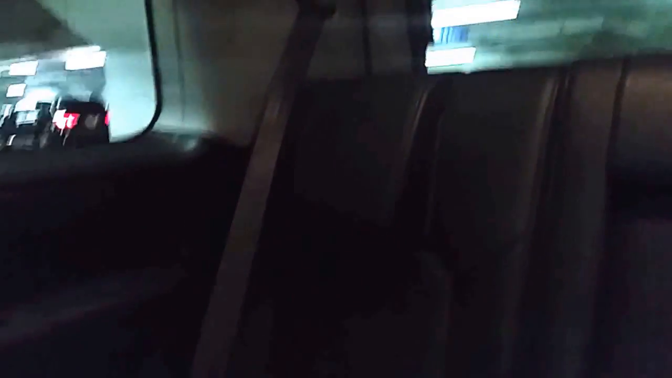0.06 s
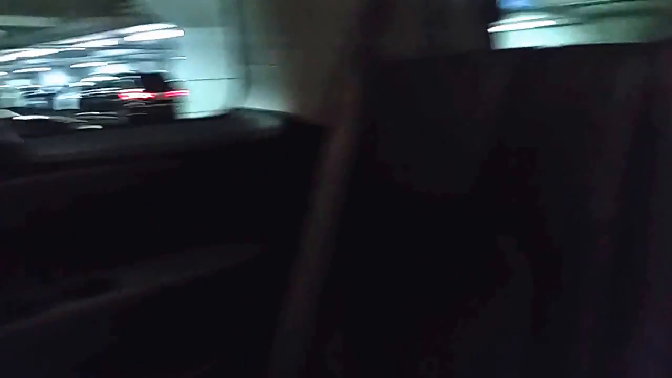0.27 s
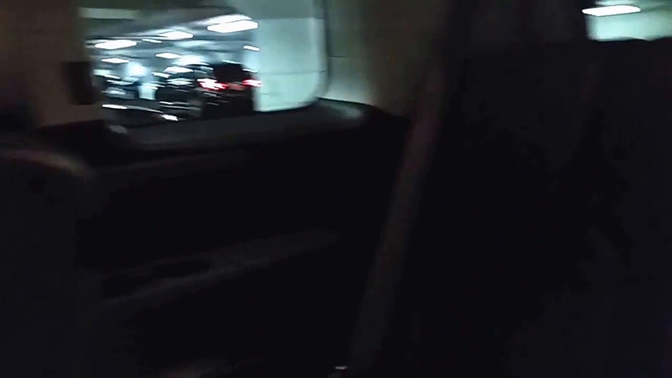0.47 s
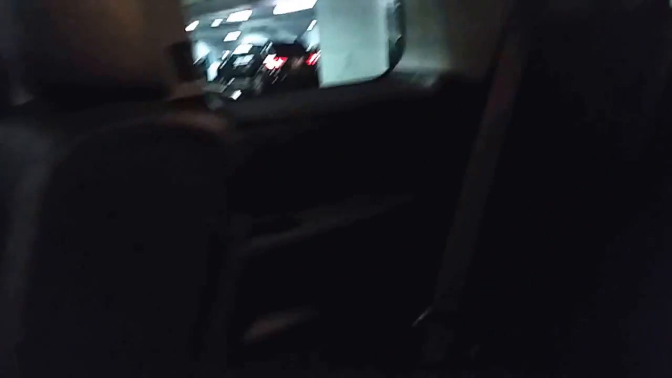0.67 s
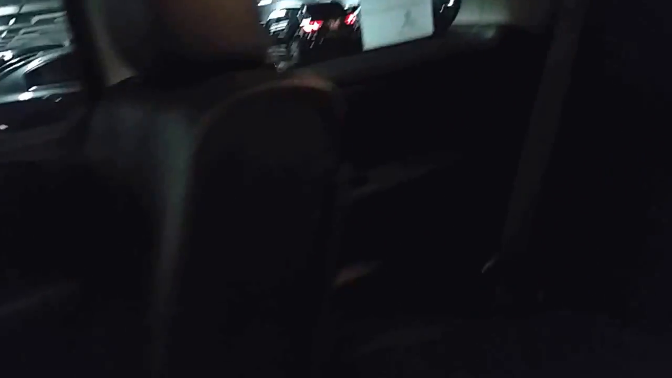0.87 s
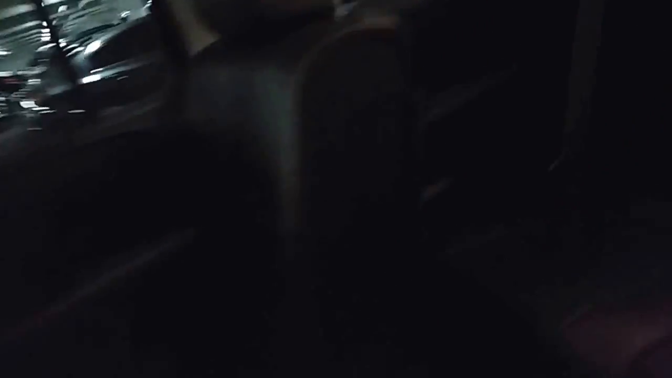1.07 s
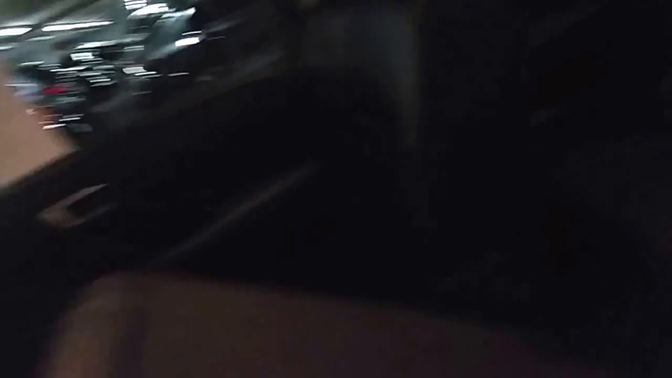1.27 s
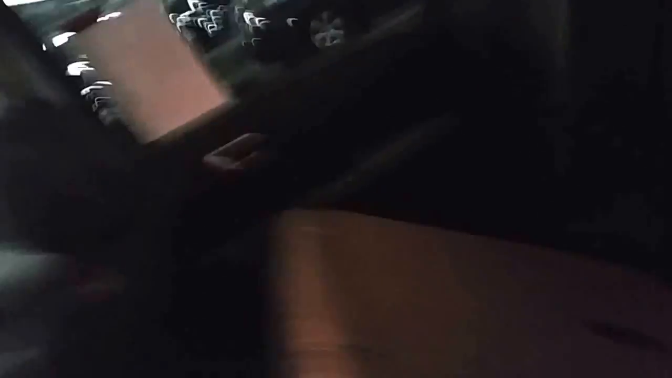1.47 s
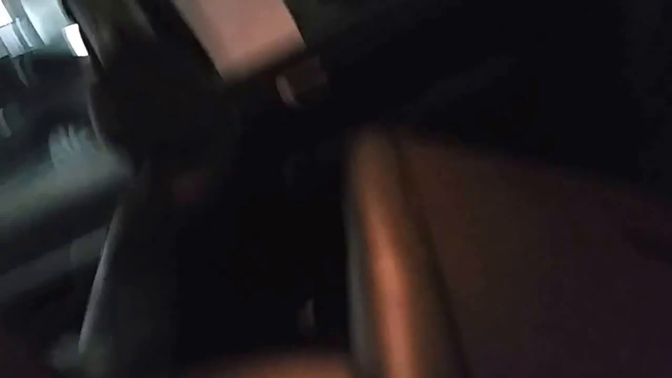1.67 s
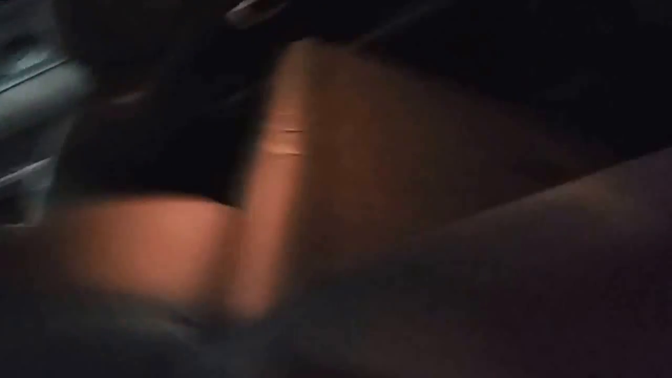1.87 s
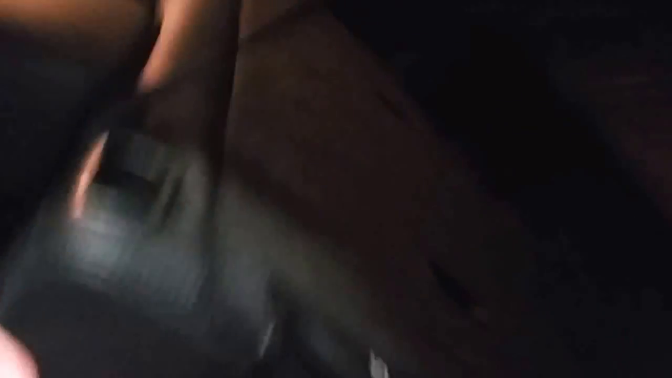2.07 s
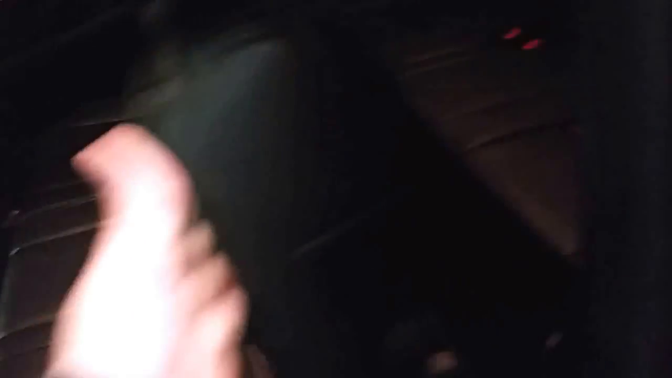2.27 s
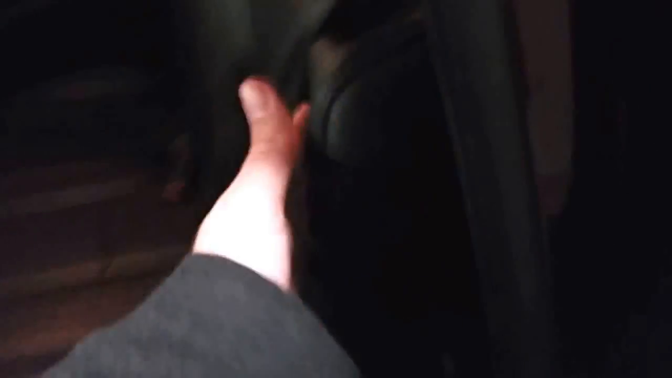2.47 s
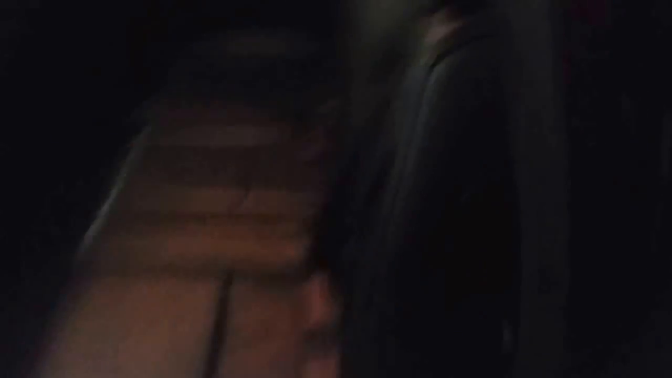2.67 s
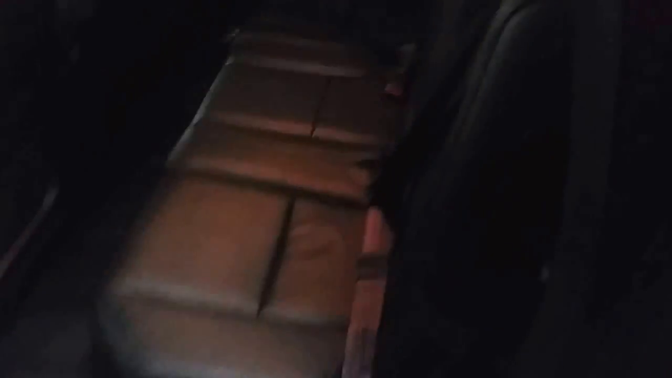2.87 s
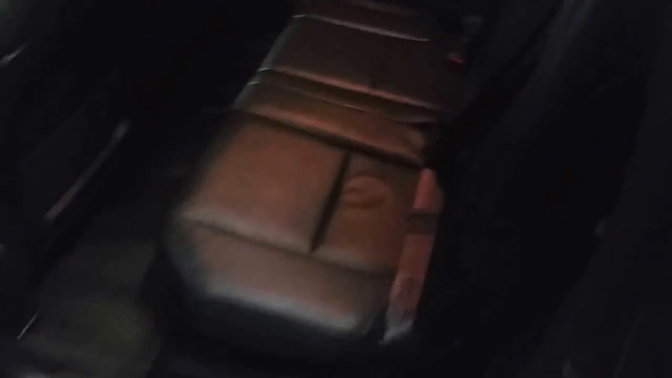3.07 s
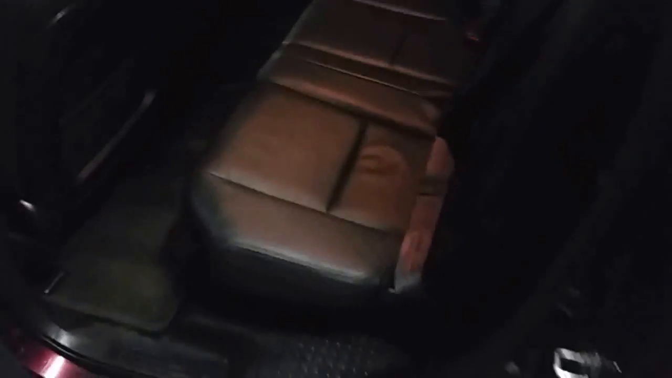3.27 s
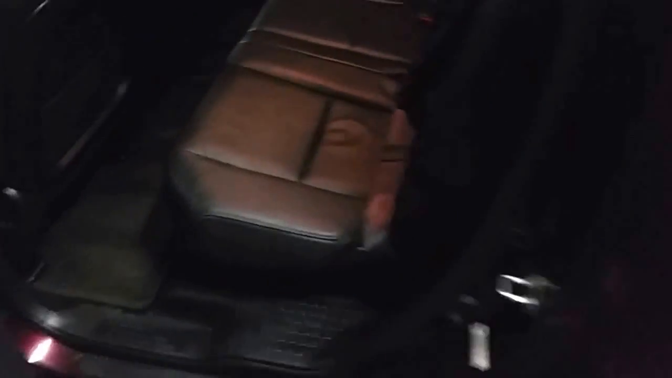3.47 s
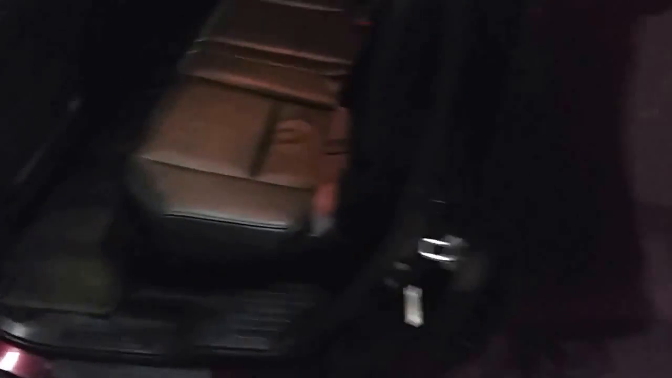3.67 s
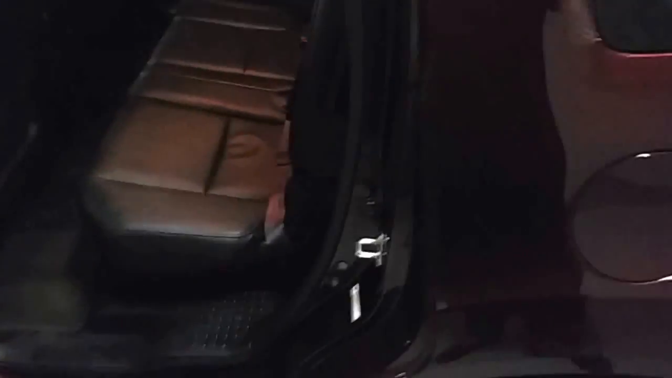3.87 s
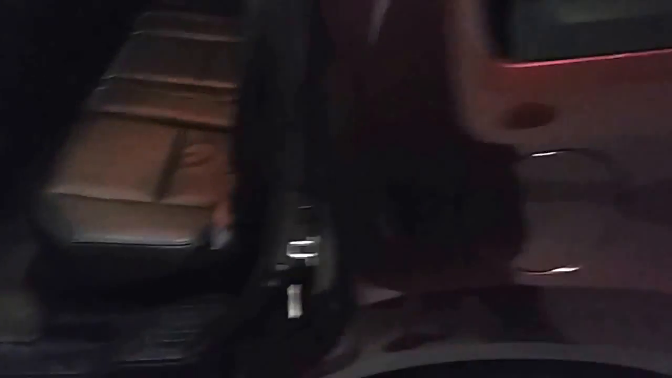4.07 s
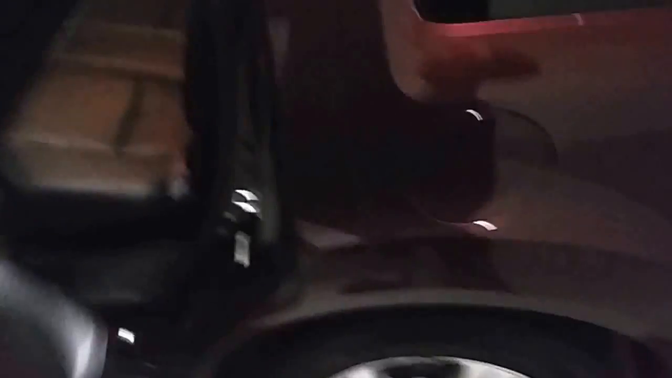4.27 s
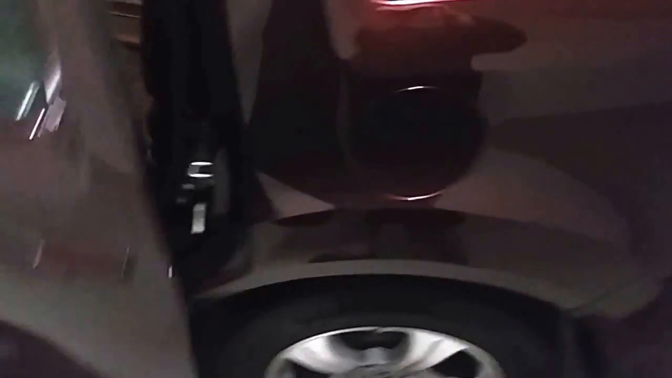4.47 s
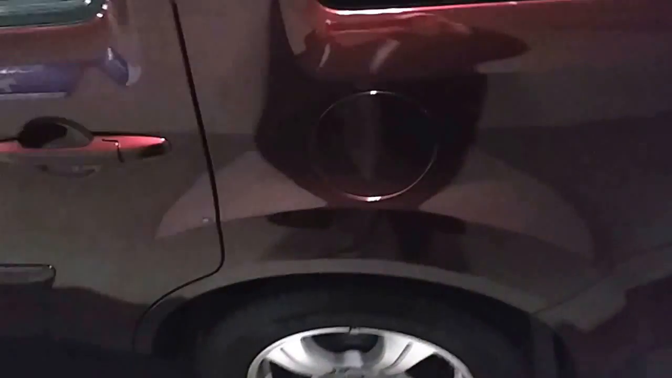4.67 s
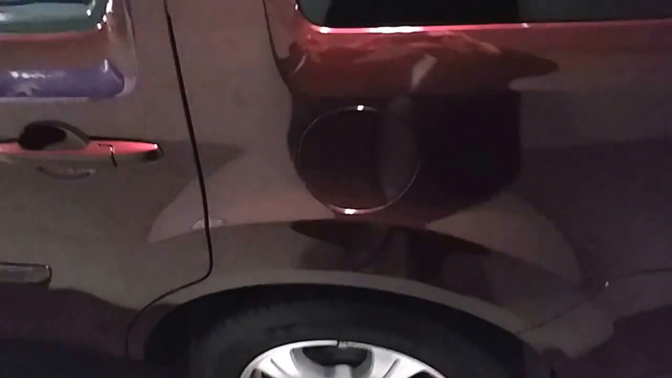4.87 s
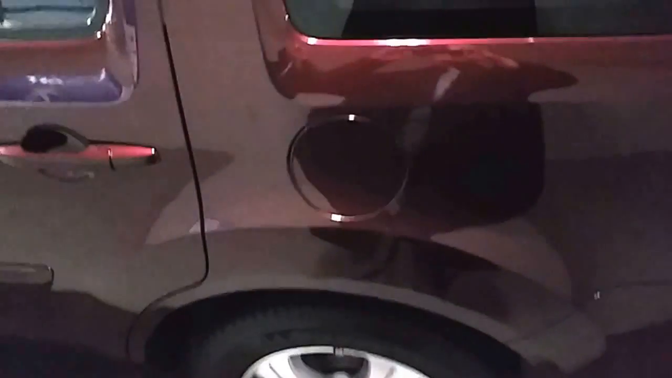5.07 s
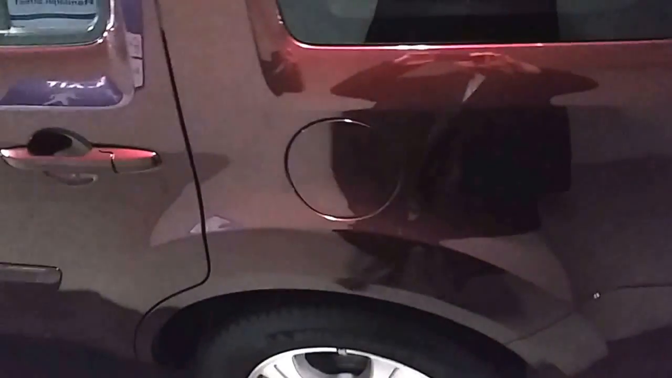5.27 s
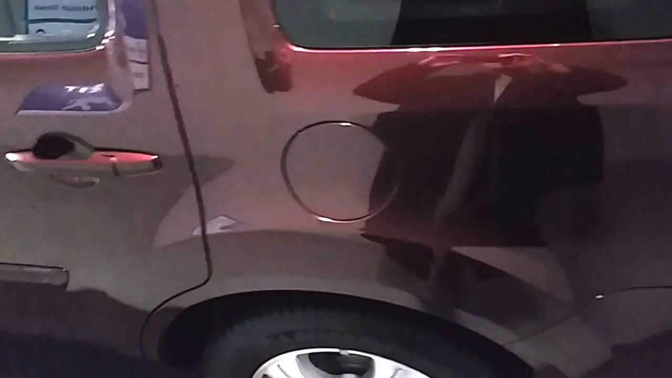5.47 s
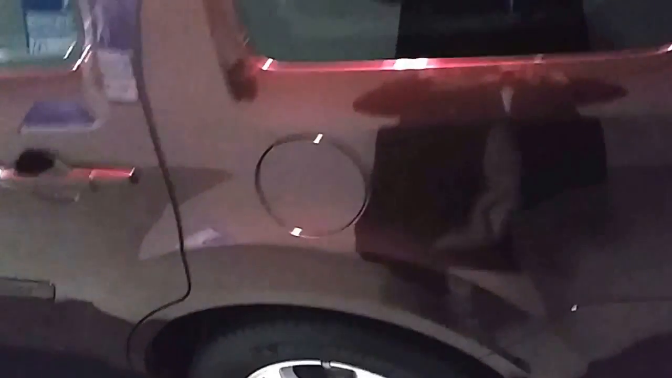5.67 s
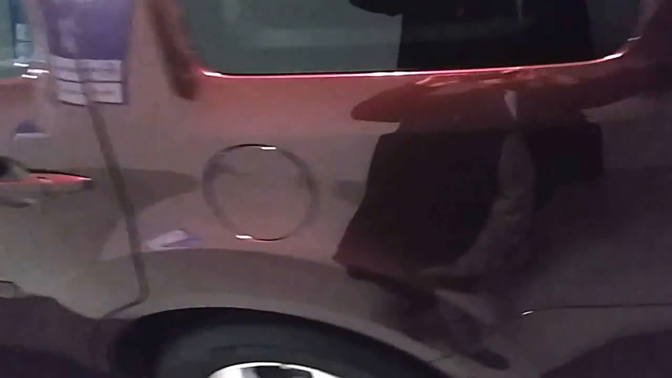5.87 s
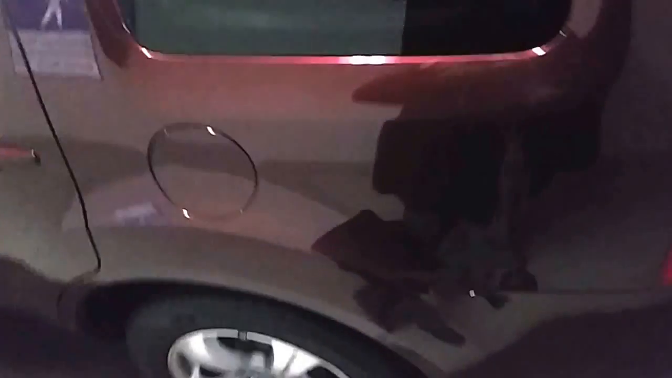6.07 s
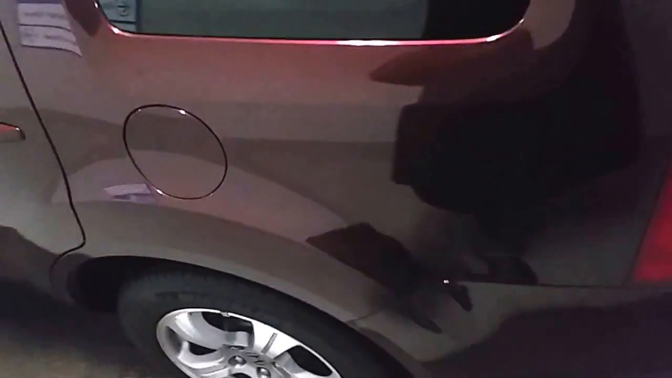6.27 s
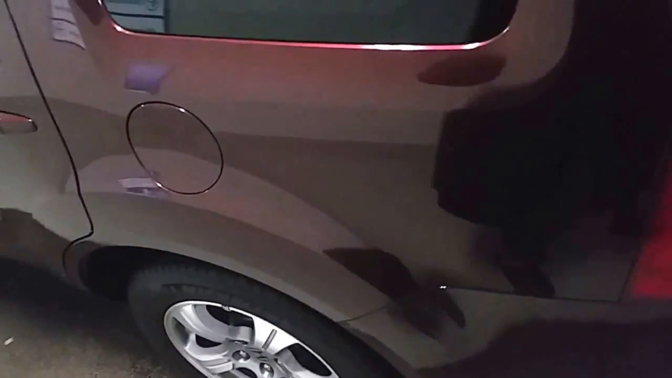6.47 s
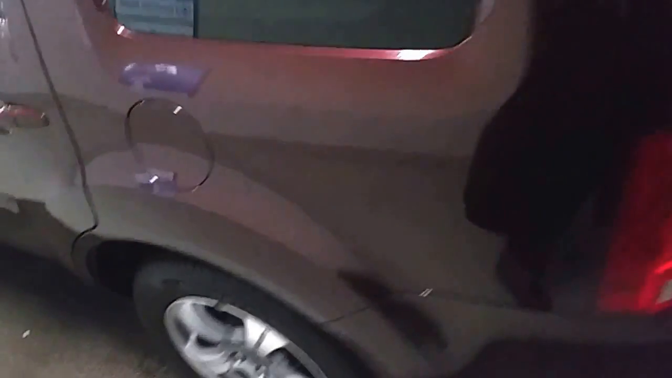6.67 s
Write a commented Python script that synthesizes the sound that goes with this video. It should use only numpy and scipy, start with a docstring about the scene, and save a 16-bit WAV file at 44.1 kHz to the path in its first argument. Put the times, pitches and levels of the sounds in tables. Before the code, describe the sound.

Close handheld stereo pickup in a car inside a concrete garage. Ventilation rumbles and hisses throughout. Fingers tap the camera case, cloth rubs leather, light knocks and clicks come from the seat trim. Metal catches clack and the seat back thumps hard and shudders, followed by a brief rough squeak. After small metallic chinks the door slams with a deep echoing boom; finally fingers bump the microphone.

```python
"""Car seat and door slam in a parking garage

Someone climbs out of a car holding a camera, over ventilation whose hiss swells and sinks.
Fingers tap the case, cloth rustles and something squeaks; a rear seat clacks into its catches and shudders.
Then the door slams and the garage answers. Impacts layer decaying modes with chattering noise bursts;
air and cloth are shaped noise. The two microphone ports colour the treble differently.
"""
import sys
import numpy as np
from scipy import signal
from scipy.fft import rfft, irfft, next_fast_len
from scipy.io import wavfile

SR = 44100
rng = np.random.default_rng(int(sys.argv[2]) if len(sys.argv) > 2 else 0)


def put_to_file(sound):
    """Save the sound as 16-bit audio at rate SR, in the file named by the first command-line argument."""
    columns = np.atleast_2d(sound).T  # one column per channel
    safe = np.clip(columns, -1, 1)
    whole_steps = np.round(safe * 32767)
    wavfile.write(sys.argv[1], SR, whole_steps.astype(np.int16))


N = 296325

# ring of the seat and cabin, before stretching: (f/Hz, level/dB, t60/s)
SEAT_MODES = [(62.8, -14, 1), (101.6, -2.5, 0.56), (126.5, 1.5, 0.29), (170.8, -0.5, 0.45),
              (221.4, -4.5, 0.36), (266, -15.5, 0.12), (346, -12, 0.4), (409, -11, 0.3)]
# dull body of a knock: (f/Hz, level/dB)
KNOCK_SPECTRUM = [(80, -31), (250, 3), (420, 2), (750, -2.5), (1100, -14), (1700, -23), (5000, -48)]
# loose trim: (f/Hz, level/dB)
RATTLE_SPECTRUM = [(250, -16), (420, 5), (650, -3), (1100, -1.5), (2000, -6), (3000, -19), (8000, -41)]
# bright crack of hard contact: (f/Hz, level/dB)
CRACK_SPECTRUM = [(100, -0.5), (400, -27), (1000, 2), (1700, 2.5), (3000, -1.5), (6000, -3.5), (11000, -4),
                  (16000, -15)]


def amp(db):
    """Turn decibels into gain."""
    return 10 ** (np.asarray(db) / 20)


def unit(x):
    """Scale to rms 1."""
    return x / np.sqrt(np.mean(x ** 2) + 1e-20)


def along(points, hz):
    """Read (f/Hz, value) points on a log frequency axis."""
    f, v = np.transpose(points)
    return np.interp(np.log(hz + 1), np.log(f + 1), v)


def filtered(x, response):
    """Shape the spectrum of x with a response of frequency."""
    n = x.shape[-1]
    padded = next_fast_len(n + SR // 10)
    spectrum = rfft(x, padded) * response(np.fft.rfftfreq(padded, 1 / SR))
    return irfft(spectrum, padded)[..., :n]


def noise(gain, n):
    """Stereo noise of rms 1, nearly mono in the bass, mixed from independent mid and side."""
    # left-right correlation: (f/Hz, correlation)
    likeness = [(60, 0.91), (250, 0.86), (600, 0.86), (1500, 0.07), (4000, 0.25), (12000, 0.37)]
    hz = np.fft.rfftfreq(n, 1 / SR)
    angle = np.arccos(np.clip(along(likeness, hz), -1, 1)) / 2
    white = rfft(rng.standard_normal((2, n)))
    mid, side = irfft(white * gain(hz) * [np.cos(angle), np.sin(angle)], n)
    return unit(np.array([mid + side, mid - side]))


def rush(spectrum, n):
    """Stereo noise with a (f/Hz, level/dB) spectrum."""
    return noise(lambda hz: amp(along(spectrum, hz)), next_fast_len(n))[:, :n]


def resonance(pitch, width, n):
    """Stereo noise through one resonance, pitch and width in Hz."""
    return noise(lambda hz: hz * width / np.abs(pitch ** 2 - hz ** 2 + 1j * hz * width), n)


def wobble(rate):
    """A random curve with `rate` knots a second, joined by straight lines."""
    knots = rng.standard_normal(int(N * rate / SR) + 2)
    return np.interp(np.arange(N) * rate / SR, np.arange(len(knots)), knots)


def fade(t, t60):
    """Exponential decay, 60 dB down after t60 seconds."""
    return np.exp(-np.log(1000) * t / t60)


def add(track, s, sound):
    """Mix a sound in at time s, cut off at the end of the track."""
    part = track[:, round(s * SR):][:, :sound.shape[-1]]
    part += sound[..., :part.shape[-1]]


def burst(spectrum, length, t60, attack, chatter_db=1.5, chatter_hz=700):
    """Dense short resonances as shaped noise, driven by chattering contact for `length` s, then dying."""
    t = np.arange(int((length + t60) * SR) + SR // 20) / SR
    knots = rng.standard_normal(int(t[-1] * chatter_hz) + 2)
    chatter_curve = np.interp(t * chatter_hz, np.arange(len(knots)), knots)
    chatter = unit(amp(chatter_db * chatter_curve))
    grains = chatter * noise(np.ones_like, next_fast_len(len(t)))[:, :len(t)]
    body = unit(filtered(grains, lambda hz: amp(along(spectrum, hz))))
    onset = 1 - np.exp(-t / attack)
    return body * onset * fade(np.maximum(t - length, 0), t60)


def ring(modes, stretch, ratio, scatter_db, detune):
    """A struck body: decaying sine modes whose strengths and pitches vary slightly with each blow."""
    t = np.arange(SR) / SR
    total = np.zeros(SR)
    for k, (hz, db, t60) in enumerate(modes):
        strength, pitch = rng.standard_normal(2)
        # alternate modes start with opposite polarity
        phase = 2 * np.pi * hz * ratio * (1 + detune * pitch) * t + np.pi * k
        total += amp(db + scatter_db * strength) * np.sin(phase) * fade(t, t60 * stretch)
    return total


def air():
    """Ventilation as shaped noise: rumble fades on leaving the cabin; fans and hiss swell and sink."""
    # level of the background hiss, read against reference_db: (t/s, level/dB)
    air_level = [
        [(0.0, -62.5), (0.288, -60.5), (0.762, -52.5), (0.85, -50)],
        [(2.7, -49), (3.06, -50), (3.376, -47.5), (3.676, -48), (4.28, -47)],
        [(4.7, -48.5), (4.92, -54), (5.2, -52.5), (5.75, -47), (6.7, -47.5)],
    ]
    # duct resonances and a bearing whine, level against the fan rush: (f/Hz, width/Hz, level/dB)
    ducts = [(117, 41, -7), (331, 55, -7.5), (780, 120, -5.5), (1626, 70, -16), (2730, 67, -17.5),
             (6790, 49, -21)]
    # low rumble: (f/Hz, level/dB)
    rumble_spectrum = [(15, -3), (35, -4), (60, -2), (110, 0), (170, -3.5), (250, -11.5), (400, -14),
                       (800, -20), (2000, -64)]
    # fan rush: (f/Hz, level/dB)
    fan_spectrum = [(100, 4), (230, 5.5), (330, -2.5), (450, -3), (620, 1), (780, 0.5), (1100, -2),
                    (1800, -6.5), (3000, -11), (6000, -25.5)]
    # airy hiss: (f/Hz, level/dB)
    hiss_spectrum = [(800, -22), (2500, 0.5), (4500, 0), (7000, -0.5), (11000, -12), (16000, -12)]
    # top-end fizz: (f/Hz, level/dB)
    fizz_spectrum = [(6000, -3), (9000, 2), (12000, 1.5), (16000, -4)]
    reference_db = -48
    fan_db, hiss_db, fizz_db = -40, -45.5, -47.5  # at the reference level
    fan_follows, fizz_follows = 0.77, 1.4  # dB per dB of hiss: treble sinks furthest when it is quiet
    step_out_s = (2.04, 4.6)  # start and end of the way out of the cabin
    cabin_rumble_db, outside_rumble_db = -37, -46
    cabin_fan_db = -2.5  # the cabin muffles the rush

    t = np.arange(N) / SR
    level_t, level_db = np.transpose(np.vstack(air_level))
    swell_db = np.interp(t, level_t, level_db) - reference_db
    inside = np.interp(t, step_out_s, [1, 0])

    rumble_db = inside * cabin_rumble_db + (1 - inside) * outside_rumble_db
    rumble = amp(rumble_db + wobble(12.0)) * rush(rumble_spectrum, N)

    fan_noise = rush(fan_spectrum, N)
    for hz, width, db in ducts:
        fan_noise += amp(db) * resonance(hz, width, next_fast_len(N))[:, :N]
    fan_level_db = fan_db + fan_follows * swell_db + cabin_fan_db * inside + 0.38 * wobble(4.7)
    fans = amp(fan_level_db) * fan_noise

    hiss = amp(hiss_db + swell_db) * rush(hiss_spectrum, N)
    fizz = amp(fizz_db + fizz_follows * swell_db) * rush(fizz_spectrum, N)
    return rumble + fans + hiss + fizz


def squeak(width_hz=230, overtone_db=-18):
    """A rough squeak, perhaps a tyre or shoe out in the garage, whose pitch and level rise and fall."""
    peak_s, level_db, rise_s, release_s = 2.39, -34, 0.08, 0.025  # peak_s: moment of the peak
    end_hz, peak_rise_hz = 1990, 369  # pitch at the ends, rise at the peak
    echo_db, echo_t60 = -10.5, 1.7  # the garage's echo of the squeak dying away
    t = np.arange(N) / SR - peak_s
    after = np.maximum(t, 0)
    swell = np.exp(-(np.minimum(t, 0) / rise_s) ** 2)
    arch = swell * np.exp(-after / release_s)
    level = np.maximum(arch, amp(echo_db) * swell * fade(after, echo_t60))
    phase = 2 * np.pi * np.cumsum(end_hz + peak_rise_hz * arch) / SR

    def grit():
        """Low-passed noise that roughens a tone."""
        return noise(lambda hz: 1 / (1 + (hz / width_hz) ** 2), next_fast_len(N))[:, :N]

    tone = grit() * np.sin(phase) + grit() * np.cos(phase)
    overtone = amp(overtone_db) * grit() * np.sin(2 * phase)
    return level * amp(level_db + 3.3 * wobble(90)) * (tone + overtone)


def sleeve(grain_db=3.0, grain_rate=300):
    """Cloth catches and slips on leather in small grains; each stroke starts quickly, slackens and fades."""
    # strokes over the seats: (t/s, length/s, level/dB)
    strokes = [(0.866, 0.44, -36.5), (1.366, 0.08, -31.5), (1.755, 0.14, -40), (2.004, 0.52, -39)]
    # rubbing cloth: (f/Hz, level/dB)
    cloth_spectrum = [(300, 0), (1200, -2.5), (2500, -4.5), (4500, 0), (7000, 0.5), (11000, -4),
                      (16000, -4)]
    attack_s, sag_db_per_s, release_t60 = 0.03, 8.5, 0.5  # grip, slackening, release
    power = np.zeros(N)
    for s, length, db in strokes:
        t = np.maximum(np.arange(N) / SR - s, 0)
        grip = np.minimum(t / attack_s, 1)
        release = fade(np.maximum(t - length, 0), release_t60)
        power += (grip * amp(db - sag_db_per_s * t) * release) ** 2
    grains = unit(amp(grain_db * wobble(grain_rate)) * rush(cloth_spectrum, N))
    return np.sqrt(power) * grains


def taps():
    """Each touch ticks on the camera case and pushes it beside the left port; a damped swing follows."""
    # fingers on the case, levels before layer trims: (t/s, level/dB, f/Hz, tick level/dB against level)
    touches = [(0.273, -18, 363, -4.5), (0.3258, -18.5, 387, -15), (0.3951, -19, 380, -9),
               (.454, -18, 384, 2), (0.7562, -21.5, 390, 10.5), (1.148, -21.5, 380, 11),
               (5.454, -14, 90, -42), (5.47, -6, 134, -35), (5.4886, -7, 136, -40), (5.942, -15, 128, -39),
               (6.081, -24, 121, -35)]
    # share of a touch that reaches the right port: (f/Hz, level/dB)
    far_port = [(130, -22), (400, -8)]
    # tick of the case: (f/Hz, level/dB)
    tick_spectrum = [(300, 1.5), (1700, 2.5), (3000, -1), (6000, -4), (9000, -24), (16000, -24)]
    swing_t60 = 0.018  # s
    out = np.zeros((2, N))
    t = np.arange(SR // 10) / SR
    for s, db, hz, tick_db in touches:
        swing = np.sin(2 * np.pi * hz * t + 0.48) * (1 - np.exp(-t * hz / 0.091)) * fade(t, swing_t60)
        case = np.sin(2 * np.pi * 480 * t) * (1 - np.exp(-t / 0.00045)) * fade(t, t60=0.005)
        pan = amp([[0], [along(far_port, hz)]])
        add(out, s, pan * (amp(db + 5.5) * swing + amp(db - 5.0) * case))
        tick = burst(tick_spectrum, length=0.0005, t60=0.005, attack=0.0001)
        add(out, s, amp(db + tick_db - 12.0) * tick)
    return out


def chinks():
    """Small hard parts of trim and metal touch and die away as noise in one resonance."""
    # clicks and chinks: (t/s, level/dB, f/Hz)
    contacts = [(1.281, -27.5, 2680), (2.144, -24, 3560), (2.16, -28.5, 3760), (3.007, -39, 6530),
                (3.237, -34, 4800), (3.336, -37, 12400), (3.365, -34.5, 12100), (3.411, -28, 12000),
                (3.441, -29, 12200), (4.39, -21.5, 3520)]
    q, t60 = 6.6, 0.049  # pitch over width, ring time in s
    out = np.zeros((2, N))
    t = np.arange(SR // 5) / SR
    envelope = (1 - np.exp(-t / 0.00037)) * fade(t, t60)
    for s, db, pitch in contacts:
        add(out, s, amp(db) * resonance(pitch, pitch / q, len(t)) * envelope)
    return out


def knocks():
    """Light knocks on the seat's trim sound short and hollow, with the seat modes pitched up."""
    # hollow knocks, level before layer trims: (t/s, level/dB)
    trim_knocks = [(1.039, -26.5), (1.088, -25), (1.955, -31)]
    out = np.zeros((2, N))
    for s, db in trim_knocks:
        add(out, s, amp(db) * burst(KNOCK_SPECTRUM, length=0.0136, t60=0.08, attack=0.0013))
        add(out, s, amp(db - 5) * ring(SEAT_MODES, stretch=0.43, ratio=1.8, scatter_db=-2.0, detune=0.0032))
        rattle = burst(RATTLE_SPECTRUM, length=0.02, t60=0.16, attack=0.0022, chatter_db=3, chatter_hz=160)
        add(out, s, amp(db - 12) * rattle)
    return out


def catches():
    """A steel catch grazes its striker, then chatters home, rings and knocks the frame."""
    # seat catches, knock level against level: (t/s, level/dB, contact/s, knock level/dB)
    clacks = [(1.024, -32.5, 0.0057, 1), (1.409, -20, 0.0056, -6), (1.441, -27, 0.0066, 0),
              (1.467, -27, .0015, 1), (1.479, -28, .002, 1), (1.985, -19.5, 0.0058, -8.5),
              (2.033, -13, .0048, -1), (2.0902, -13.5, .0078, -6), (2.234, -28, 0.0064, 4.5)]
    # steel ring, before stretching: (f/Hz, level/dB, t60/s)
    catch_modes = [(1070, 9, 0.1), (1670, -16, 0.041), (2100, 2, 0.044), (3370, -5, 0.032),
                   (4600, 1.5, .05), (5330, -5, 0.028), (6750, -8, .07)]
    graze_s, graze_db = 0.0085, -15  # lead of the graze, level against the hit
    dying = 7  # t60 over contact time: long chatter dies slowly
    out = np.zeros((2, N))
    for s, db, contact, knock_db in clacks:
        graze = burst(CRACK_SPECTRUM, length=0.0024, t60=0.03, attack=0.00034)
        add(out, s - graze_s, amp(db + graze_db) * graze)
        add(out, s, amp(db) * burst(CRACK_SPECTRUM, contact, dying * contact, attack=0.00039))
        add(out, s, amp(db - 18.0) * ring(catch_modes, stretch=0.46, ratio=1, scatter_db=2.0, detune=0.015))
        add(out, s, amp(db + knock_db) * burst(KNOCK_SPECTRUM, contact, t60=0.08, attack=0.00034))
    return out


def shudder(s, db, count=6):
    """A blow and its rebounds, each later, weaker and looser: yields (t/s, level/dB, ring stretch)."""
    first_gap_s, gap_growth, loss_db = 0.063, 1.2, 3.1  # loss per rebound
    rest_db = -19.5  # the padding swallows any weaker rebound
    # ring stretch at 0 dB, its exponent per dB, its growth with each rebound
    share, share_per_db, growth = 1.15, 0.024, 1.204
    stretch = share * np.exp(share_per_db * db)
    for k in range(count):
        yield s, db, stretch
        s += first_gap_s * gap_growth ** k
        db -= loss_db
        stretch *= growth
        if db < rest_db:
            return


def seat():
    """The padded back thumps home, shudders and rattles its trim."""
    # blows of the seat back, level before layer trims: (t/s, level/dB)
    thumps = [(1.05, -24.5), (1.166, -28.5), (1.408, -20), (2.097, -8)]
    # shaking seat: (f/Hz, level/dB)
    shake_spectrum = [(30, -12), (70, -1), (150, 1), (260, -3), (420, -14.5), (650, -24), (1300, -35),
                      (2500, -56), (6000, -45)]
    out = np.zeros((2, N))
    for thump in thumps:
        for s, db, stretch in shudder(*thump):
            add(out, s, amp(db - 5.0) * ring(SEAT_MODES, stretch, ratio=1, scatter_db=1.5, detune=0.0039))
            add(out, s, amp(db - 5.5) * burst(shake_spectrum, length=0.026, t60=0.55 * stretch, attack=0.0049))
            add(out, s, amp(db - 13.0) * burst(KNOCK_SPECTRUM, length=0.008, t60=0.1, attack=0.00064))
            rattle = burst(RATTLE_SPECTRUM, length=0.02, t60=0.37 * stretch, attack=0.0022,
                           chatter_db=9, chatter_hz=157)
            add(out, s, amp(db - 21) * rattle)
    return out


def door(push_time=0.0023):
    """The latch touches first, then the door hits its seal, shoves the air and booms."""
    # contacts with latch and seal, levels before layer trims:
    # (t/s, panel level/dB, latch level/dB, crack level/dB, air push level/dB)
    contacts = [(4.3429, -32, -15, -51, -60), (4.346, -37, -11, -49, -50), (4.3654, -13, -13.5, -24.5, -4),
                (4.389, -10.5, -18, -34, -10), (4.4, -16, -21.5, -34, -9)]
    # door skin and cabin air, before detuning and stretching: (f/Hz, level/dB, t60/s)
    door_modes = [(30, -4, 1), (59.16, -1.5, 0.87), (80.6, -8, 0.39), (111.3, -2, 0.36), (137, -6.5, 0.23),
                  (164, -3.5, 0.21), (223.4, -0.5, 0.24), (260, -4.5, .25), (401, -6.5, 0.25),
                  (675, -5, 0.14)]
    # shaking door: (f/Hz, level/dB)
    shake_spectrum = [(25, 1), (70, -10), (130, 2.5), (230, -1), (330, -7.5), (600, -10.5), (1100, -35),
                      (2000, -29), (5000, -45)]
    # latch behind its trim, before detuning and stretching: (f/Hz, level/dB, t60/s)
    pawl_modes = [(876, -5, 0.063), (1070, -1, 0.045), (1188, -1.5, 0.025), (1646, -7.5, 0.028)]
    # latch clatter: (f/Hz, level/dB)
    latch_spectrum = [(150, -22), (450, 3), (1100, 0.5), (1700, -7.5), (2600, -19.5), (6000, -46)]
    out = np.zeros((2, N))
    u = np.arange(SR // 10) / SR / push_time
    push = (1 - u) * np.exp(-u) * (1 - np.exp(-4 * u))  # pressure swings out, then back
    for s, panel_db, latch_db, crack_db, push_db in contacts:
        add(out, s, amp(push_db + 6.5) * push)
        boom = ring(door_modes, stretch=0.85, ratio=0.99, scatter_db=0.0, detune=0.015)
        add(out, s, amp(panel_db - 3.5) * boom)
        add(out, s, amp(panel_db - 6.0) * burst(shake_spectrum, length=0.012, t60=0.38, attack=0.0012))
        pawl = ring(pawl_modes, stretch=0.63, ratio=0.97, scatter_db=1.5, detune=0.015)
        add(out, s, amp(latch_db + 1) * pawl)
        add(out, s, amp(latch_db - 4) * burst(latch_spectrum, length=0.003, t60=0.06, attack=0.00017))
        add(out, s, amp(crack_db) * burst(CRACK_SPECTRUM, length=0.0016, t60=0.1, attack=0.0005))
    return out


def garage(x, delay=0.025):
    """Concrete walls answer late and keep the low notes longest: convolution with decaying noise."""
    # reverberation: (f/Hz, t60/s)
    reverb_times = [(40, 2.37), (200, 1.1), (800, 1.26), (2500, 1), (6000, 0.27), (14000, 0.76)]
    hz, t, z = signal.stft(noise(np.ones_like, 2 * SR), SR, nperseg=512)
    decay = fade(t, along(reverb_times, hz)[:, None])
    tail = signal.istft(z * decay, SR, nperseg=512)[1]
    tail = tail / np.linalg.norm(tail[0])
    tail = np.pad(tail, ((0, 0), (int(delay * SR), 0)))
    return signal.fftconvolve(x, tail, axes=1)[:, :N]


def scene():
    """The door sends the most into the garage echo; the seat and small sounds send less."""
    seat_and_small = seat() + catches() + knocks() + chinks() + squeak()
    slam = door()
    echoes = garage(amp(-11) * slam + amp(-15.5) * seat_and_small)
    return air() + sleeve() + taps() + seat_and_small + slam + echoes


def record(dry):
    """Each port has its own treble resonance and phase; peaks are rounded off and the band is limited."""
    # colour of the left microphone port: (f/Hz, level/dB)
    left_port = [(60, 1), (300, 2), (700, 1), (2000, 2), (2900, 0.5), (4400, 5.5), (5600, 2), (6900, 7.5),
                 (7700, -1), (8700, -14.5), (11000, -9.5), (15500, -8)]
    # colour of the right microphone port: (f/Hz, level/dB)
    right_port = [(60, 2), (300, -1), (700, -4), (2000, -1), (2900, -7), (4200, -13), (5600, -19),
                  (8600, -12.5), (9700, -1.5), (11000, 7), (12800, -0.5), (15500, -7)]
    # phase by which the left port leads: (f/Hz, phase/rad)
    lead = [(30, .05), (120, 0.23), (300, 0.56), (800, 0.94), (2000, 1), (12000, 1.7)]
    top_hz = 16200

    def ports(hz):
        """Complex response of both ports, the phase lead split evenly between them."""
        gain = amp([along(left_port, hz), along(right_port, hz)])
        return gain * np.exp(0.5j * np.outer([1, -1], along(lead, hz)))

    x = filtered(dry, ports)
    x = x / (1 + np.abs(x) ** 6) ** (1 / 6)  # soft limit towards full scale
    return filtered(x, lambda hz: hz < top_hz)


dry = scene()
out = record(dry)
put_to_file(out)
```